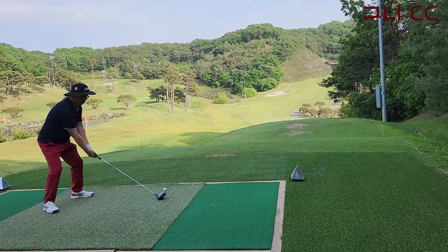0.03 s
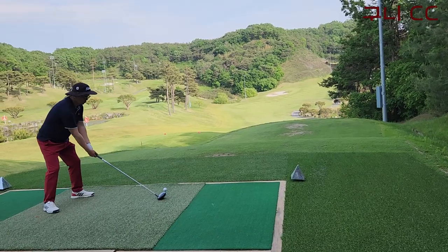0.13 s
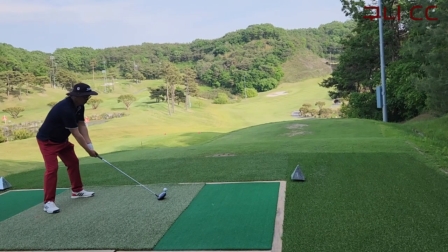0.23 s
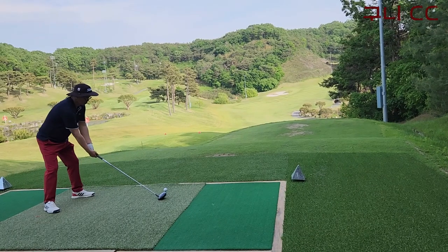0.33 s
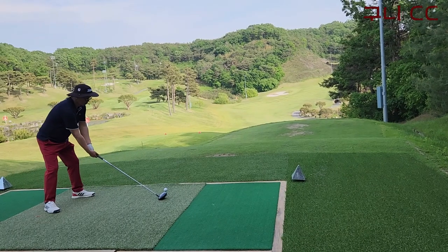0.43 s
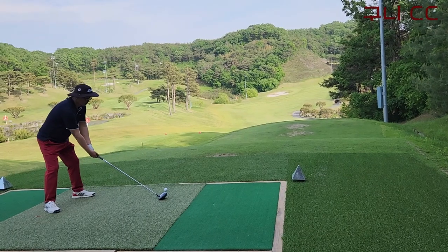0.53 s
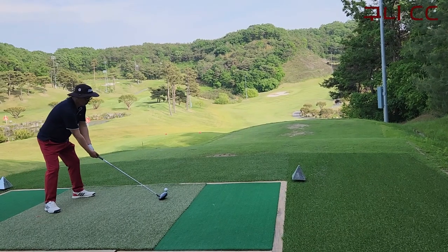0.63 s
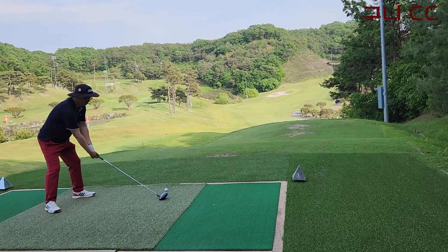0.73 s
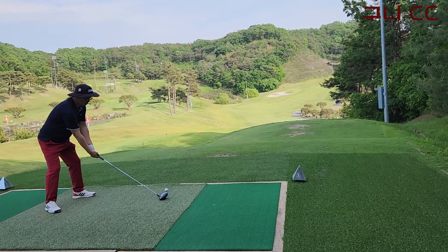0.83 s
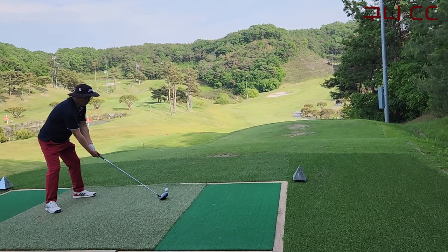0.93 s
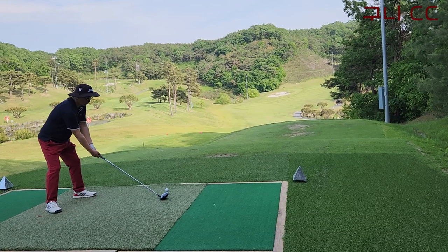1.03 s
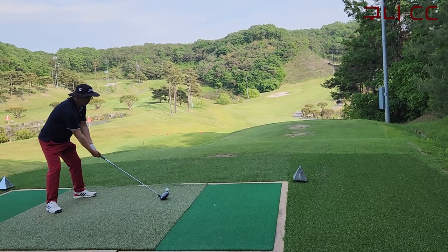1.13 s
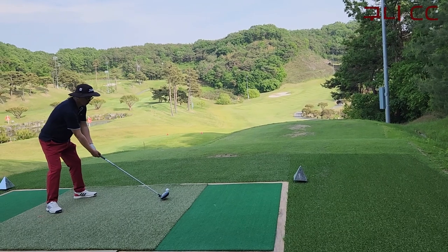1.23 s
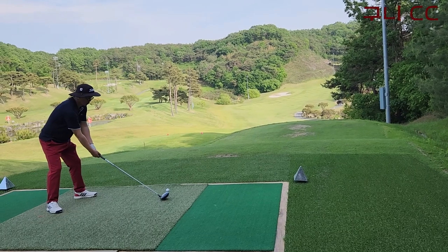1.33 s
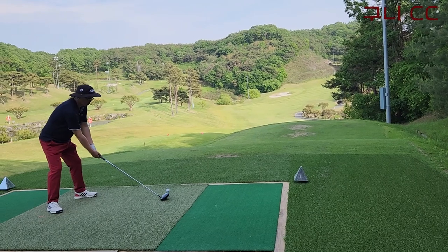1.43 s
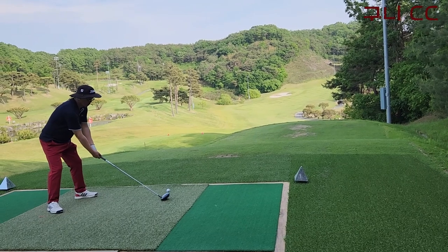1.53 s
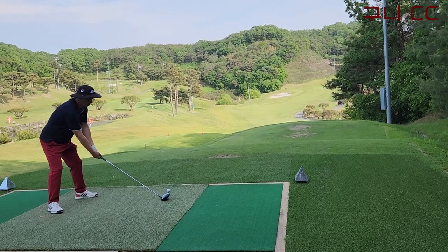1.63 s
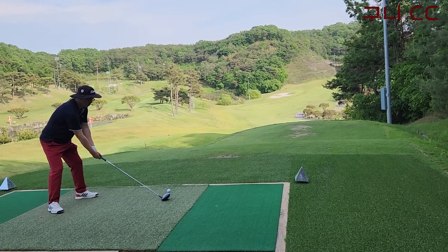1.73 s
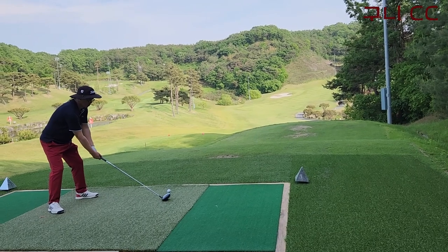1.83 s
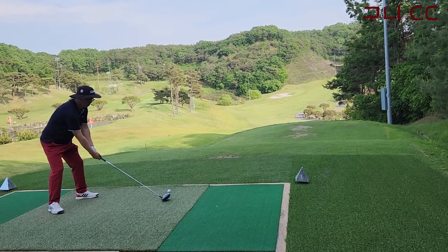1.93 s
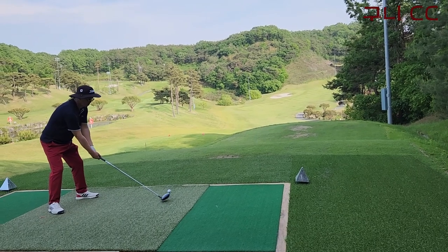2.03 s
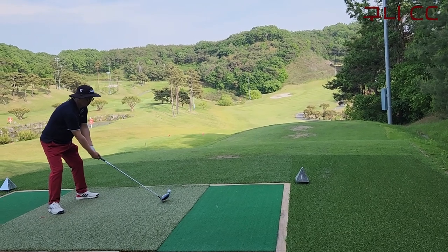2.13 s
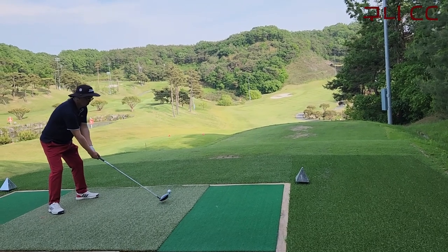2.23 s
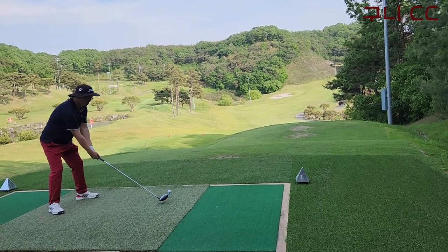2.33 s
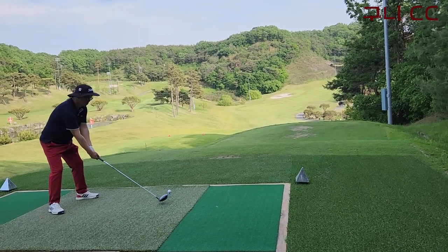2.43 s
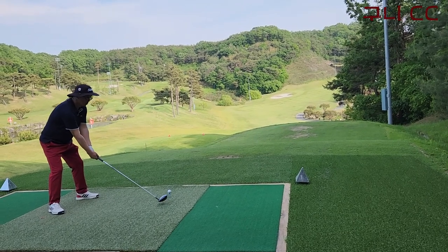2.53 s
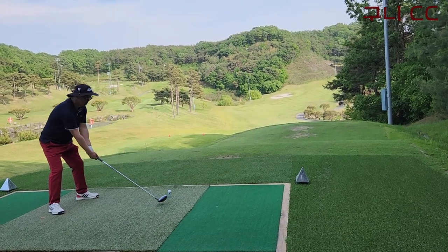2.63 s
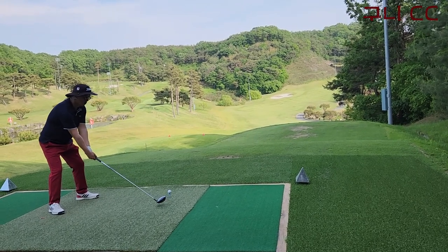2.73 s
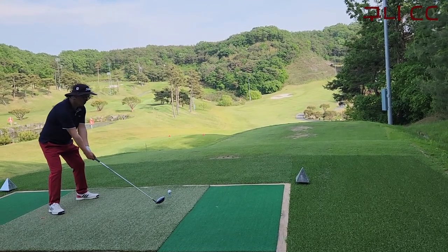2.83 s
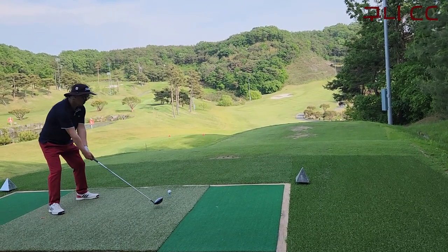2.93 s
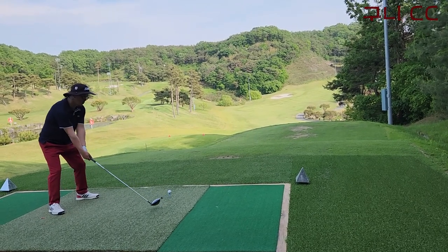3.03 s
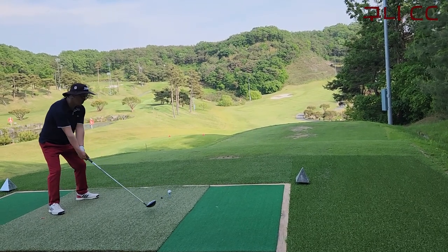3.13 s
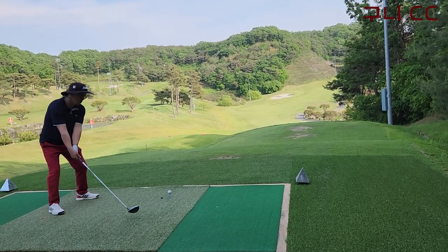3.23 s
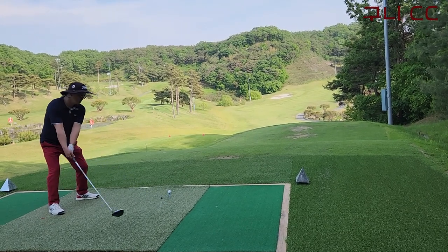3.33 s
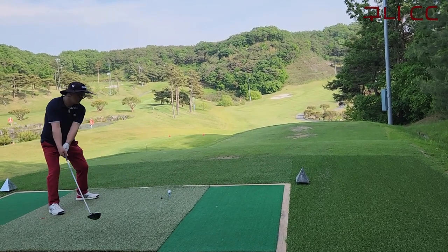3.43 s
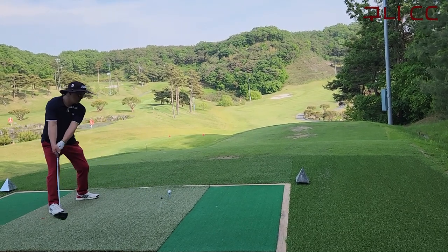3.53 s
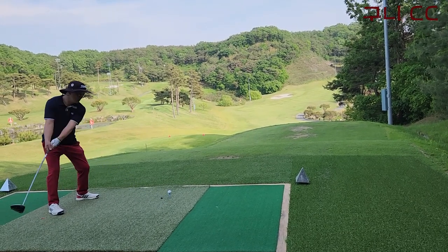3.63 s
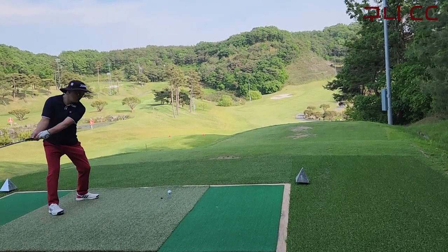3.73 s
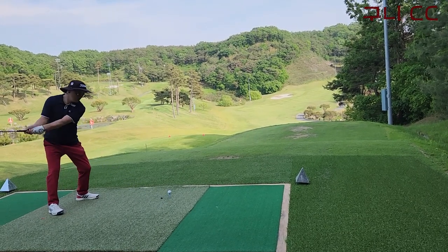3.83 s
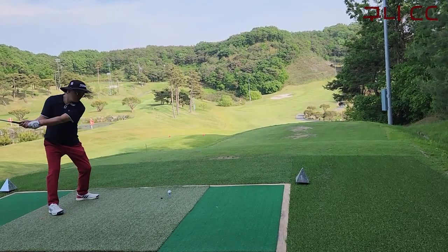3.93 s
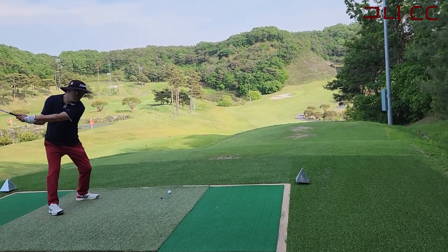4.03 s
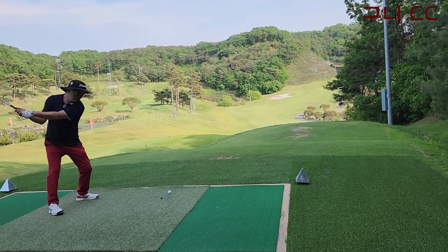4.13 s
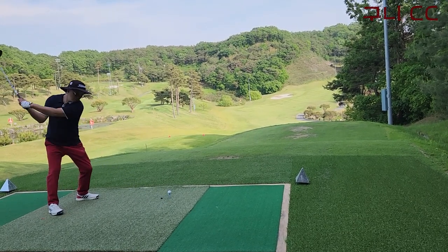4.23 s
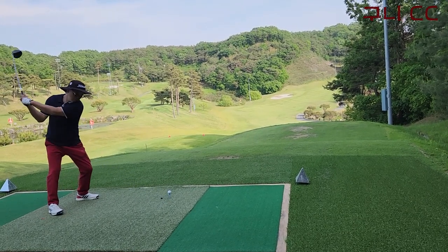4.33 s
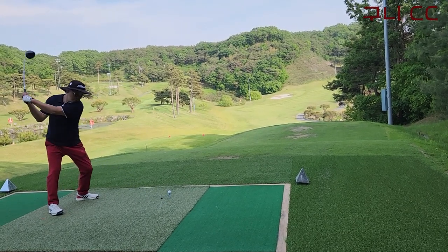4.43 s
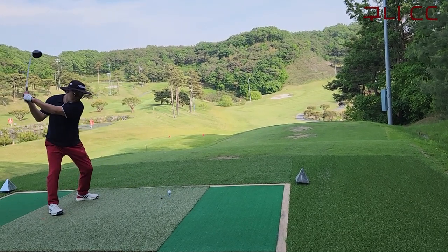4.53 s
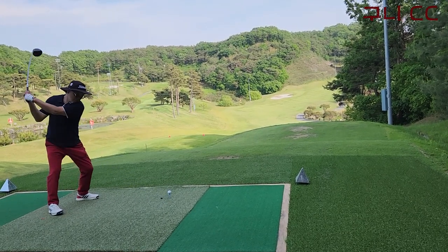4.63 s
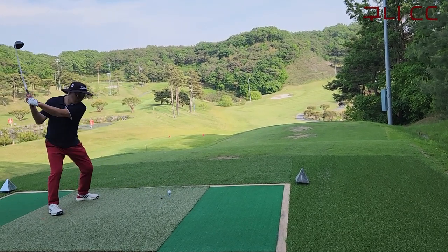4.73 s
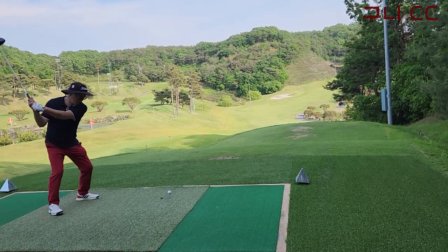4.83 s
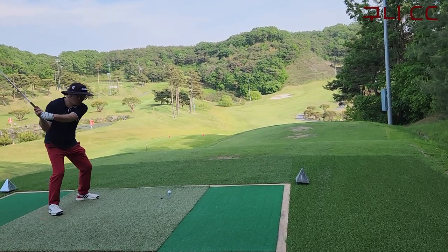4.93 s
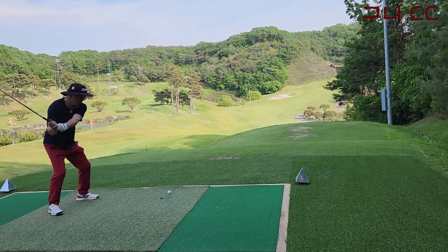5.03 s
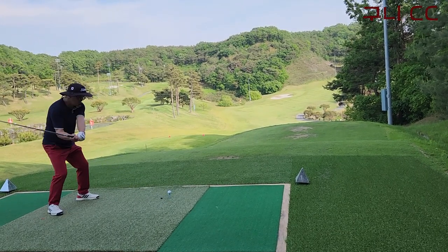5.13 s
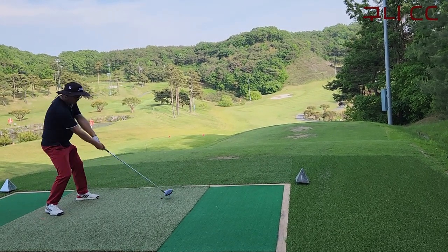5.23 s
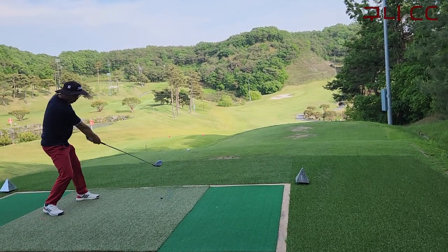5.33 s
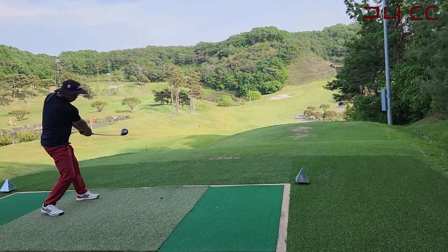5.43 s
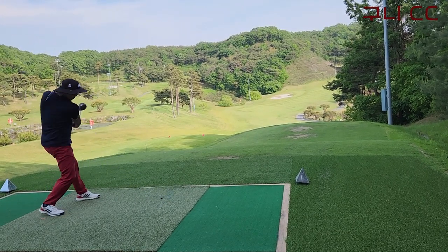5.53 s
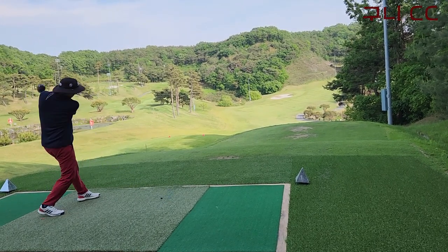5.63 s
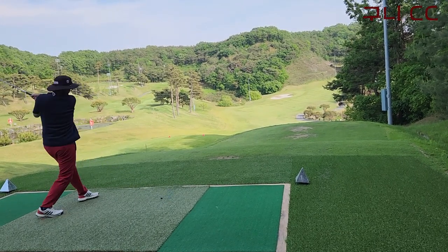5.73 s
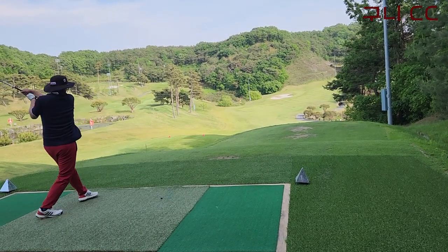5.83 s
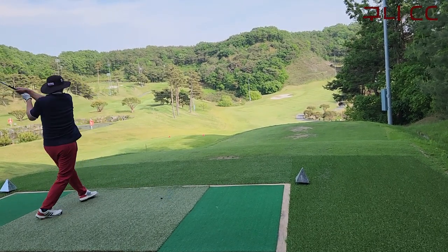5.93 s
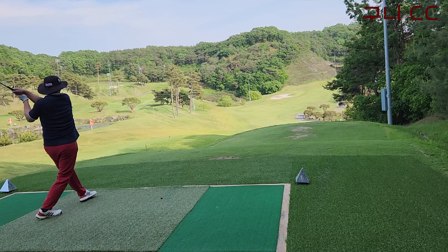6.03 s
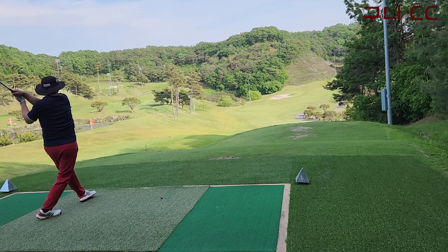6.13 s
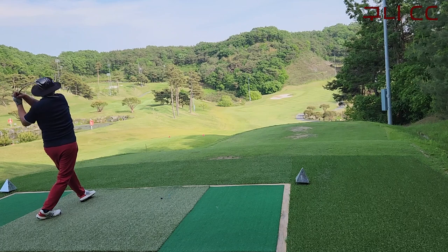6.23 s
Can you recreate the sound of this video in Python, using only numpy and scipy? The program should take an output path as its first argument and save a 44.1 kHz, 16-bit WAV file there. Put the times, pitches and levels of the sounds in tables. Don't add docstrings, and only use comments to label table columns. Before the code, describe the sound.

Faint open air and distant engine sink in pitch, a slowed club whooshes, cracks loudly on a ball, and the echo washes through trees.

```python
import sys
import numpy as np
from scipy import signal
from scipy.fft import rfft, irfft
from scipy.io import wavfile
from scipy.ndimage import uniform_filter1d, minimum_filter1d

SR = 44100
rng = np.random.default_rng(int(sys.argv[2]) if len(sys.argv) > 2 else 0)


def file_out(sig):
    cols = np.atleast_2d(sig).T
    lim = np.clip(cols, -1, 1)
    pcm = np.round(lim * 32767).astype(np.int16)
    wavfile.write(sys.argv[1], SR, pcm)


def ratio_of_db(decibels):
    return 10 ** (np.asarray(decibels, float) / 20)


N = 276727

SLOW_FROM_S, SLOW_SPEED = 2.058, 0.4
HIT_S = 5.2757


def at_hz(points, hz):
    table = np.array(points, float)
    return np.interp(np.log(np.maximum(hz, 1)), np.log(table[:, 0]), table[:, 1])


def rms_one(x):
    return x / np.sqrt(np.mean(x ** 2) + 1e-20)


def evened(x, span_s):
    return x / np.sqrt(uniform_filter1d(x ** 2, round(span_s * SR)) + 1e-12)


def coloured(x, points):
    size = x.shape[-1]
    gain = ratio_of_db(at_hz(points, np.fft.rfftfreq(size, 1 / SR)))
    return irfft(rfft(x) * gain, size)


def ported(x, balance):
    half = np.array(balance) * [1, 0.5]
    return np.array([coloured(x[0], half), coloured(x[1], half * [1, -1])])


def port_noise(size, speed, late_s):
    # true-speed frequency in Hz, share common to both ports from 0 to 1.
    shared = [(60, 1), (150, 1), (300, 0.99), (600, 0.07), (1200, 0.05), (3000, 0.4), (9000, 0)]
    hz = np.fft.rfftfreq(size, 1 / SR) / speed
    common, left, right = rfft(rng.standard_normal((3, size)))
    share = np.clip(at_hz(shared, hz), 0, 1)
    delay = np.exp(-2j * np.pi * hz * late_s)
    together = np.sqrt(share) * common * np.array([delay, np.ones_like(delay)])
    apart = np.sqrt(1 - share) * np.array([left, right])
    return irfft(together + apart, size)


def ring(x, hz, t60):
    r, w = ratio_of_db(-60 / (t60 * SR)), 2 * np.pi * hz / SR
    return signal.lfilter([0, np.sin(w)], [1, -2 * r * np.cos(w), r * r], x + 1e-18)


def wavering_tone(hz, width_hz):
    r = np.exp(-2 * np.pi * width_hz / SR)
    noise = rng.standard_normal((2, len(hz) + SR))
    slow = signal.lfilter([1], [1, -2 * r, r * r], noise)[:, SR:]
    phase = 2 * np.pi * np.cumsum(hz) / SR
    return rms_one(slow[0] * np.cos(phase) + slow[1] * np.sin(phase))


def strike(size):
    # frequency in Hz, left level in dB, right level in dB, t60 in seconds.
    ball_modes = [
        (300, -8, -11, .036),
        (550, -11, -16, .04),
    ]
    # frequency in Hz, left in dB, right in dB, t60 in seconds.
    head_modes = [(547, -16.5, -22.5, 0.078), (1260, -12.5, -33, .06), (1459, -2.5, -16, 0.092),
                  (2045, -9, -14.5, 0.0823), (2420, -22, -24.5, .06), (2790, -6, -7.5, 0.11),
                  (3026, -20.5, -9, 0.09), (3460, -11.5, -11, 0.06), (4234, -24, -17, 0.09),
                  (4730, -23.5, -20.5, 0.081), (5270, -26, -34, .07), (5540, -10, -31, 0.076),
                  (6040, -20, -30, 0.046), (6900, -24.5, -31, .047)]
    # frequency in Hz, level in dB per Hz.
    crack_colour = [(88, -36.5), (150, -17), (563, -9.5), (1050, -13), (1460, -15), (2260, -6),
                    (2720, -1.5), (3730, -12.5), (6820, -12), (8000, -17), (10700, -50.5), (18000, -120)]
    # frequency in Hz, left minus right in dB.
    crack_balance = [(60, -6), (100, 2), (180, 10.5), (310, 4.5), (540, 10), (940, 1), (1640, -6.5),
                     (2850, -4.5), (4940, 13.5), (8570, 2.5)]

    t = np.arange(size) / SR
    late = t - np.array([[0], [0.00024]])
    squeeze = np.sin(2 * np.pi * np.clip(late / 0.002, 0, 1)) * ratio_of_db([[-5.5], [-9]])
    after = np.maximum(late - 0.0008, 0)
    for hz, left_db, right_db, t60 in ball_modes:
        fading = ratio_of_db([[left_db], [right_db]] - 60 * after / t60)
        squeeze = squeeze - np.sin(2 * np.pi * hz * after) * fading

    rising = np.clip((t - 0.0008) / 0.0012, 0, 1)
    burst = rising * (ratio_of_db(-60 * np.maximum(t - 0.006, 0) / 0.027) + ratio_of_db(-9 - 60 * t / 0.17))
    crackle = ratio_of_db(-9.5) * rms_one(coloured(rng.standard_normal((2, size)), crack_colour)) * burst
    crackle = ported(np.pad(crackle, ((0, 0), (441, 0))), crack_balance)[:, 441:]

    shell = np.zeros((2, size))
    for hz, left_db, right_db, t60 in head_modes:
        phase = 2 * np.pi * rng.random()
        shell += ratio_of_db([[left_db], [right_db]] - 60 * t / t60) * np.sin(2 * np.pi * hz * late + phase)
    shell *= np.clip(late / 0.005, 0, 1)
    return squeeze + shell + crackle, shell


def forerun():
    # frequency in Hz, left level in dB, right level in dB.
    thin_tones = [(2750, -46, -37), (3050, -48, -38), (3450, -45, -35), (4250, -46, -42), (5100, -38, -46),
                  (6600, -44, -52)]
    t = np.arange(N) / SR - HIT_S
    noise = rng.standard_normal((2, N))
    ringing = sum(ratio_of_db([[left_db], [right_db]]) * rms_one(ring(noise, hz, 0.1))
                  for hz, left_db, right_db in thin_tones)
    return ringing * ratio_of_db(450 * np.minimum(t + 0.012, 0)) * np.clip(-t / 0.008, 0, 1)


def swish():
    # level at full speed in dB, gathering in dB per s, closing in dB per s.
    swish_levels = [
        (-37.5, 618, 62),
        (-48, 306, 188),
        (-56, 311, 230),
    ]
    # frequency in Hz, level in dB per Hz.
    rush_colour = [(250, -38), (420, -9), (555, 1.5), (707, -11.5), (952, -4.5), (1150, -7.5),
                   (3600, -15.5), (4680, -60.5), (7920, -120)]
    # frequency in Hz, level in dB per Hz.
    hiss_colour = [(2120, -40.5), (3600, -26.5), (3900, -14.5), (4730, -3.5), (6900, -8), (7730, -13),
                   (8200, -29.5), (10700, -54.5), (18000, -120)]
    # start in seconds, end in seconds, start in Hz, end in Hz, level in dB.
    whistles = [
        (5.1, 5.16, 4350, 5250, -55),
        (5.125, 5.18, 4900, 6300, -58.5),
        (5.165, 5.23, 4300, 5600, -58),
    ]
    full_speed_s, closing_s, shaft_hz = 5.118, 5.21, 275

    t = np.arange(N) / SR
    gathering = np.minimum(t - full_speed_s, 0)
    closing = np.clip(t - closing_s, 0, HIT_S - closing_s)
    tone_db, rush_db, hiss_db = [db + gather * gathering + close * closing
                                 for db, gather, close in swish_levels]
    tone_hz = np.full(N, shaft_hz)
    air = port_noise(N, SLOW_SPEED, 0)
    out = ratio_of_db(tone_db) * evened(wavering_tone(tone_hz, width_hz=40.0), 0.018) * ratio_of_db([[1], [-1]])
    out = out + ratio_of_db(0.6 * tone_db - 18) * evened(wavering_tone(tone_hz / 5.6, width_hz=9.8), 0.04)
    out = out + ratio_of_db(rush_db) * rms_one(coloured(air, rush_colour))
    out = out + ratio_of_db(hiss_db) * rms_one(coloured(air, hiss_colour))
    for start, end, from_hz, to_hz, db in whistles:
        swell = np.sin(np.pi * np.clip((t - start) / (end - start), 0, 1))
        whistle_hz = np.interp(t, [start, end], [from_hz, to_hz])
        out = out + ratio_of_db(db) * swell * wavering_tone(whistle_hz, width_hz=170.0)
    swinging = np.interp(t, [HIT_S - 0.012, HIT_S - 0.004, HIT_S + 0.04], [1, 0.35, 0])
    return out * swinging


def bank(direct):
    # delay after the hit in seconds, left level in dB, right level in dB.
    bank_echoes = [
        (.044, -23.5, -18),
        (.053, -11.5, -14),
        (.098, -23, -22),
    ]
    dull = signal.sosfilt(signal.butter(1, 3500, fs=SR, output="sos"), direct[::-1])
    out = np.zeros_like(direct)
    for s, left_db, right_db in bank_echoes:
        lag = round(s * SR)
        out[:, lag:] += dull[:, :-lag] * ratio_of_db([[left_db], [right_db]])
    return out


def returns(shell):
    # left level in dB, right level in dB, t60 in seconds.
    scatterers = [
        (-31, -35, 0.53),
        (-46.5, -46.5, 1.38),
    ]
    # delay after the hit in seconds, gain in dB, spread in seconds.
    far_answer = (0.51, 1.0, 0.045)
    # frequency in Hz, level in dB per Hz.
    wash_colour = [(71, -40.5), (120, -8), (365, -12), (610, -7), (703, -16), (839, -5), (1240, -13),
                   (1480, 1), (1790, -8.5), (2470, 2.5), (4040, -12.5), (6070, -13), (8200, -18.5),
                   (10700, -50.5), (18000, -120)]
    # frequency in Hz, left minus right in dB.
    wash_balance = [(60, -2), (100, -2), (180, -1), (310, 0), (540, -1.5), (940, -8), (1640, -3),
                    (2850, -6.5), (4940, 7), (8570, 5.5)]
    # frequency in Hz, change in dB per s.
    thinning = [(100, -31.5), (190, -29), (300, 28.5), (450, 15), (800, -3), (1500, -7.5), (2500, -11),
                (4000, -28.5), (6000, -40), (8000, -64)]
    first_s, densest_s, patchy_db = 0.027, 0.058, 1.8

    size = shell.shape[1]
    t = np.arange(size) / SR
    arriving = np.clip((t - first_s) / (densest_s - first_s), 0, 1)
    strength = arriving * sum(ratio_of_db([[left_db], [right_db]] - 60 * (t - densest_s) / t60)
                              for left_db, right_db, t60 in scatterers)
    far_s, far_db, spread_s = far_answer
    strength = strength * ratio_of_db(far_db * np.exp(-((t - far_s) / spread_s) ** 2))

    white = port_noise(size, SLOW_SPEED, 0)
    wash = ratio_of_db(13) * rms_one(coloured(white, wash_colour)) * uniform_filter1d(strength, 200, axis=1)
    ringing = signal.fftconvolve(white * strength, shell[::-1], axes=1)[:, :size]
    ringing = ratio_of_db(-12 - 55 * t) * ringing

    hz, times, cells = signal.stft(wash + ringing, SR, nperseg=256)
    patches = uniform_filter1d(rng.standard_normal(cells.shape), size=4, axis=1)
    patches = uniform_filter1d(patches, size=12, axis=2)
    cells = cells * ratio_of_db(at_hz(thinning, hz)[:, None] * times + patchy_db * rms_one(patches))
    return ported(signal.istft(cells, SR, nperseg=256)[1][:, :size], wash_balance)


def shuffles():
    # time in seconds, peak in dB, frequency in Hz, left minus right in dB.
    moves = [
        (4.71, -37.5, 300, 3),
        (5.702, -44, 595, 18),
        (5.876, -41, 345, -5),
        (6.144, -43, 290, 1),
        (6.241, -45, 717, -10),
    ]
    out, t = np.zeros((2, N)), np.arange(2000) / SR
    for s, db, hz, pan_db in moves:
        scuff = rms_one(ring(rng.standard_normal(len(t)), 1.76 * hz, 0.011))
        swell = (t / 0.0041) * np.exp(1 - t / 0.0048)
        knock = (np.sin(2 * np.pi * hz * t) + 0.3 * scuff) * swell * ratio_of_db(db - 8.5)
        at = round((s - 0.003) * SR)
        out[:, at:at + len(t)] += (knock * ratio_of_db([[pan_db / 2], [-pan_db / 2]]))[:, :N - at]
    return out


def tick():
    # time in seconds, level in dB, frequency in Hz.
    leaf_tick = (2.41, -79, 5000)
    s, db, hz = leaf_tick
    t = np.arange(N) / SR - s
    rustle = rms_one(ring(rng.standard_normal((2, N)), hz, 0.003))
    return ratio_of_db(db) * rustle * np.exp(-(t / 0.0097) ** 2)


def background(spectrum, level_db, speed, engine_db):
    # frequency in Hz, width in Hz, level in dB rms.
    engine_orders = [(55.7, 2.2, -60), (115, 6.7, -51), (177, 19, -57.5), (350, 8, -72.5), (398, 12, -68.5),
                     (598, 14, -74)]
    # start in seconds, end in seconds, change in dB.
    lull = (5.6, 6.03, -4)
    # frequency in Hz, left minus right in dB.
    port_balance = [(60, 1.0), (100, 1.0), (180, 2.0), (310, 1.0), (540, -3.0), (940, -4.5), (1640, -1.0),
                    (2850, -1.0), (4940, 3.0), (8570, 6.5)]
    right_late_s = 0.000534

    air = ratio_of_db(level_db) * rms_one(coloured(port_noise(N, speed, -right_late_s), spectrum))
    leaf_band = np.array([(150, -30), (300, 0), (9000, 0), (10500, -30)]) * [speed, 1]   # Hz, dB
    leaves = coloured(air, leaf_band)
    start, end, lull_db = lull
    breeze = ratio_of_db(np.interp(np.arange(N) / SR, [start, end], [0, lull_db]))
    engine = np.zeros(N)
    for hz, width_hz, db in engine_orders:
        order = wavering_tone(np.full(N, hz * speed), width_hz * speed)
        engine += ratio_of_db(db + engine_db) * evened(order, 0.23)
    return ported(air + leaves * (breeze - 1) + engine, np.array(port_balance) * [speed / SLOW_SPEED, 1])


def scene():
    # frequency in Hz, level in dB per Hz.
    air_true = [(20, -69), (45, -6), (235, -10.5), (300, -22.5), (420, -29.5), (500, -30), (1000, -29),
                (1450, -21), (1800, -22.5), (2400, -16), (4400, -30.5), (5500, -28), (7400, -30),
                (9020, -42.5), (10000, -57), (12000, -57.5)]
    # frequency in Hz, level in dB per Hz.
    air_slowed = [(12, -38.5), (20, -2.5), (54, -3), (93, -8.5), (123, -18.5), (159, -27), (190, -31.5),
                  (285, -22.5), (378, -26.5), (555, -19.5), (999, -16), (1390, -24.5), (2920, -27),
                  (4070, -52), (9000, -61.5), (11700, -102), (19800, -120)]
    at = round(HIT_S * SR)
    slowed = background(air_slowed, -48, SLOW_SPEED, engine_db=-7.0)
    slowed = slowed + swish() + forerun() + shuffles() + tick()
    direct, shell = strike(N - at)
    slowed[:, at:] += direct + bank(direct) + returns(shell)
    normal = background(air_true, -49, 1, engine_db=-1.6)
    return np.where(np.arange(N) < SLOW_FROM_S * SR, normal, slowed)


def band_limit(x):
    return signal.sosfilt(signal.butter(12, 11980, fs=SR, output="sos"), x)


def record(dry):
    rounded = 1.3 * np.tanh(dry / 1.3)
    slow_top = signal.cheby2(14, 46, 8350, fs=SR, output="sos")
    dull = signal.sosfilt(slow_top, rounded)
    joined = np.where(np.arange(N) < SLOW_FROM_S * SR, rounded, dull)
    room_left = np.minimum(1, 0.9 / (np.abs(joined).max(axis=0) + 1e-9))
    gain = uniform_filter1d(minimum_filter1d(room_left, size=89), size=45)
    return band_limit(joined * gain)


dry = scene()
out = record(dry)
file_out(out)
```